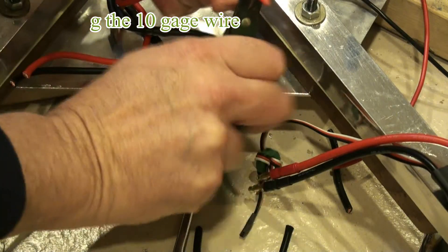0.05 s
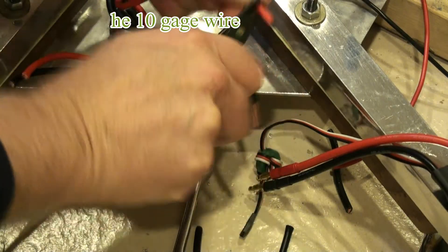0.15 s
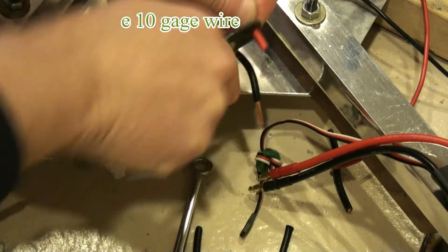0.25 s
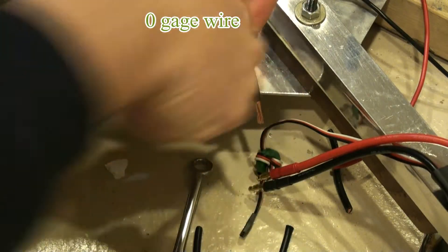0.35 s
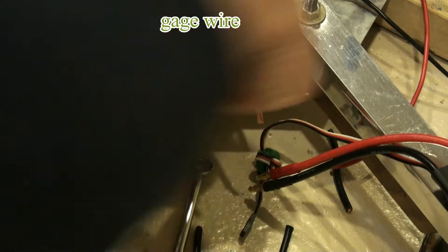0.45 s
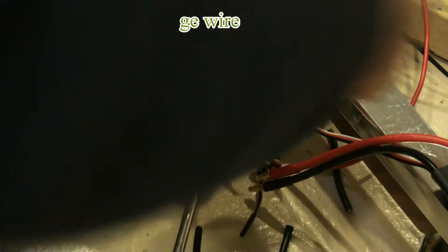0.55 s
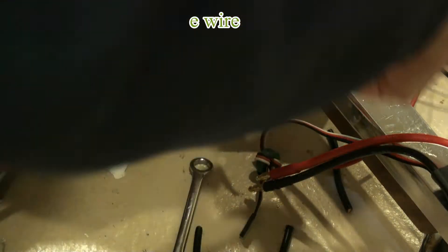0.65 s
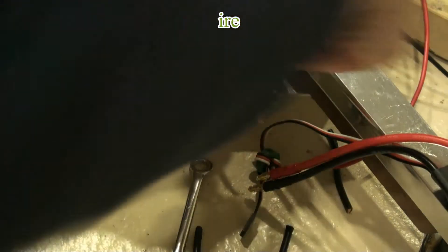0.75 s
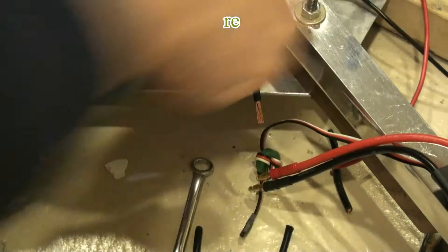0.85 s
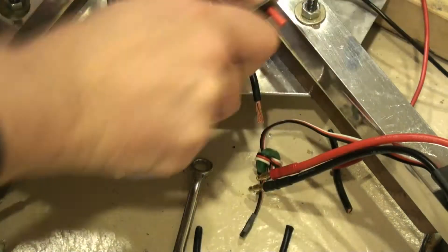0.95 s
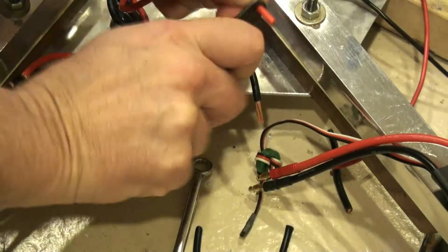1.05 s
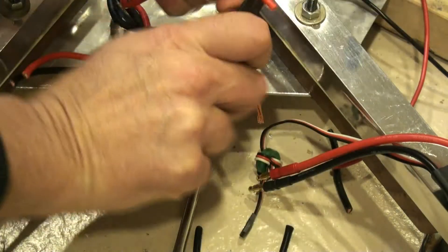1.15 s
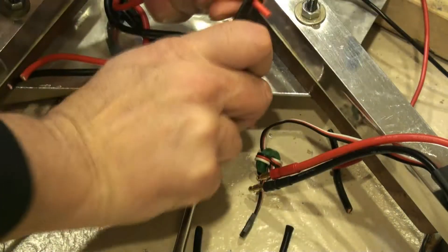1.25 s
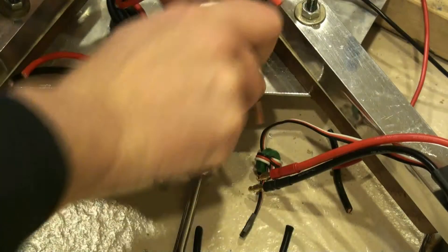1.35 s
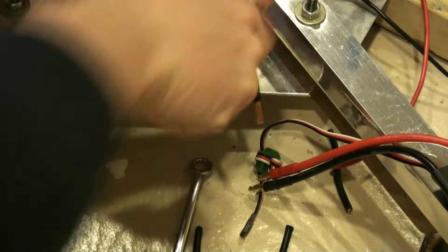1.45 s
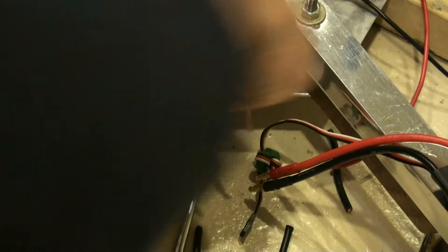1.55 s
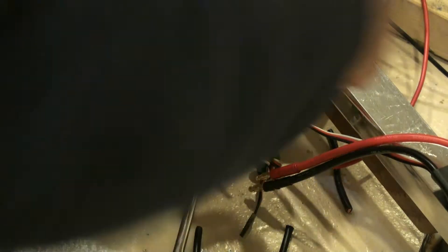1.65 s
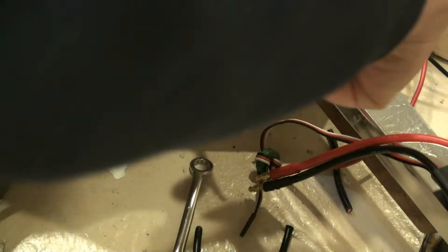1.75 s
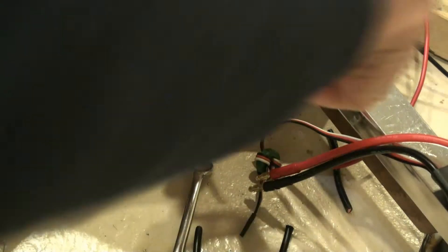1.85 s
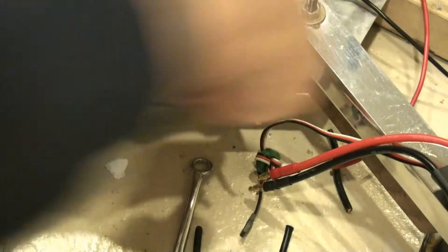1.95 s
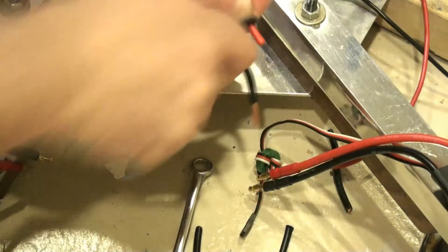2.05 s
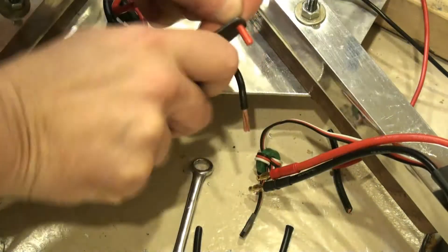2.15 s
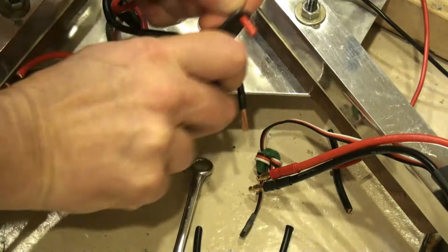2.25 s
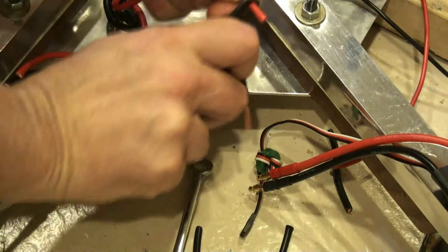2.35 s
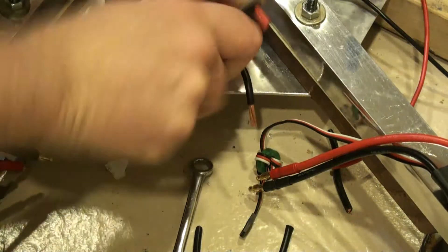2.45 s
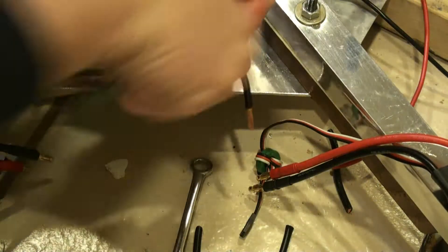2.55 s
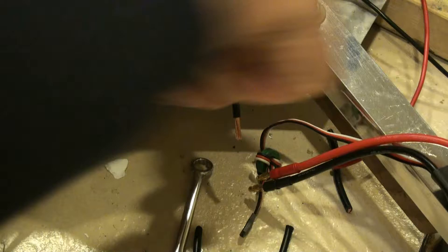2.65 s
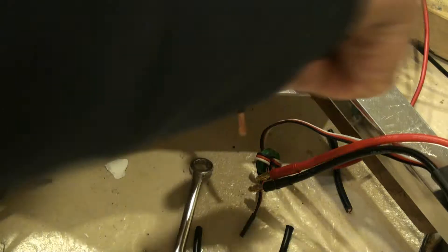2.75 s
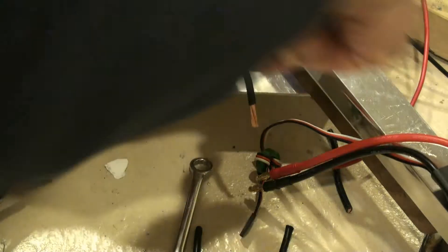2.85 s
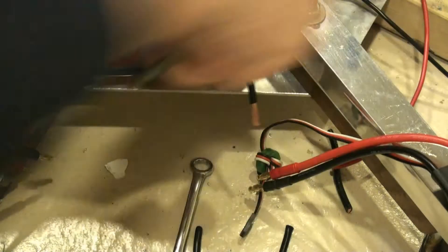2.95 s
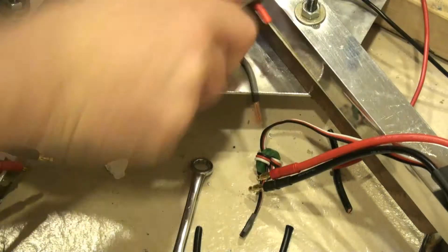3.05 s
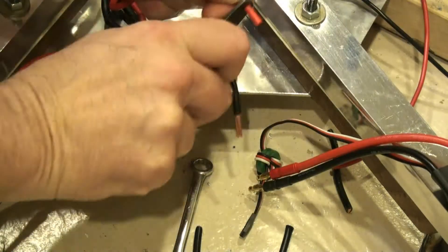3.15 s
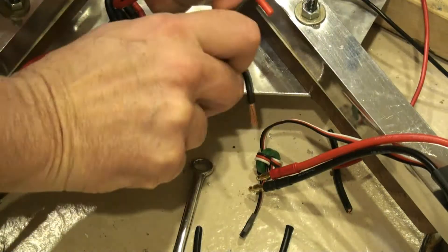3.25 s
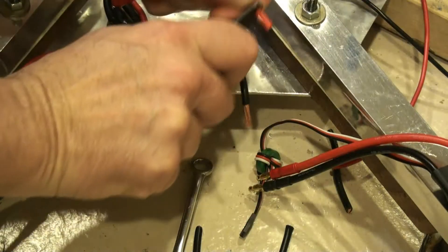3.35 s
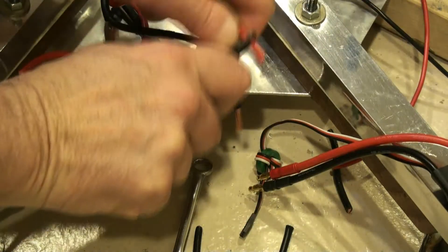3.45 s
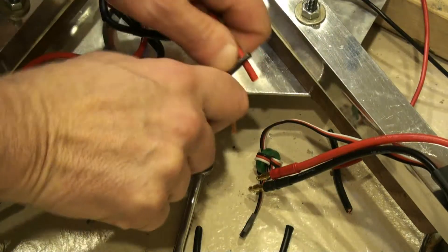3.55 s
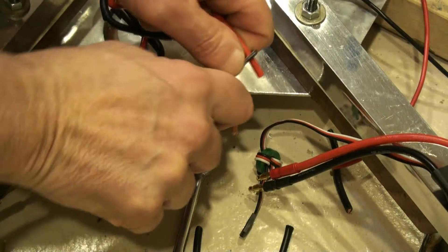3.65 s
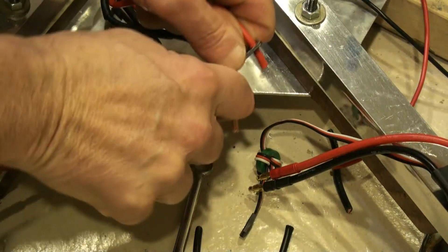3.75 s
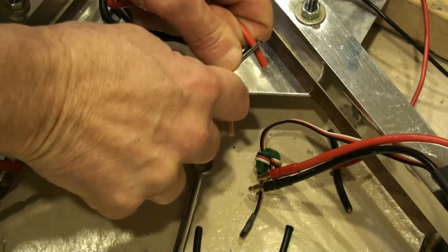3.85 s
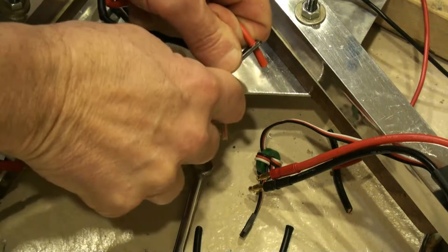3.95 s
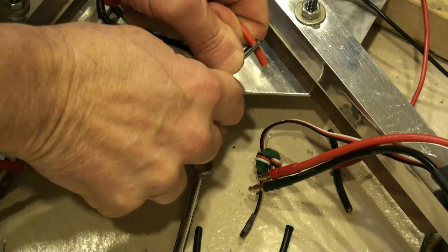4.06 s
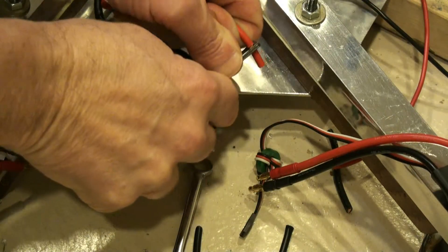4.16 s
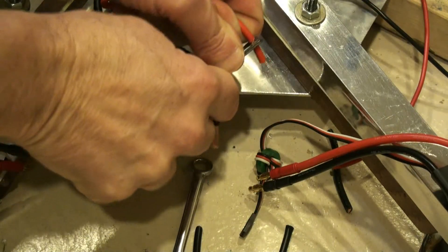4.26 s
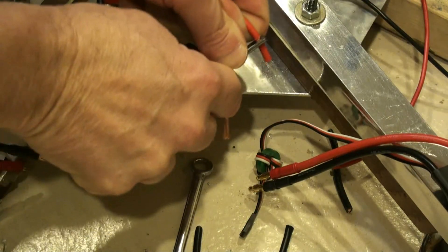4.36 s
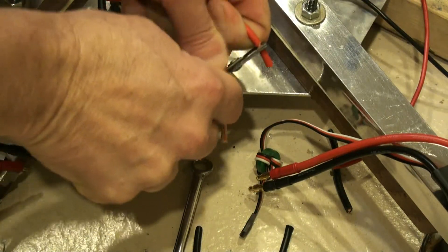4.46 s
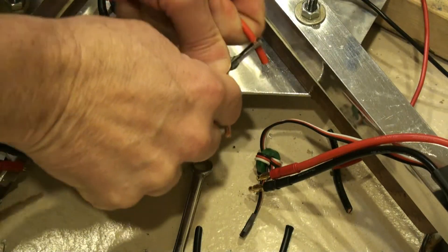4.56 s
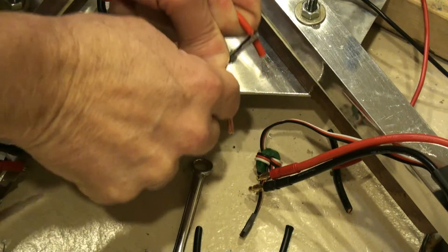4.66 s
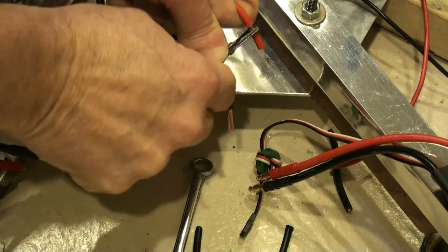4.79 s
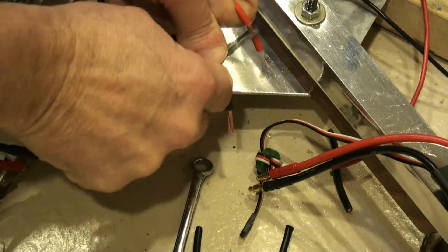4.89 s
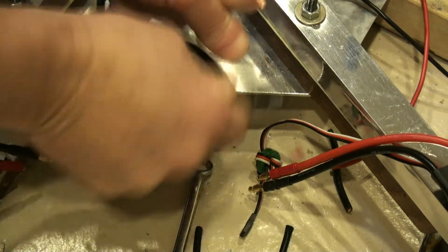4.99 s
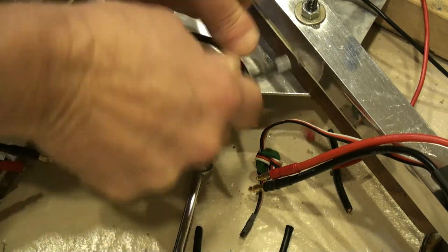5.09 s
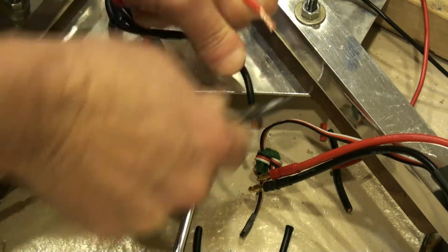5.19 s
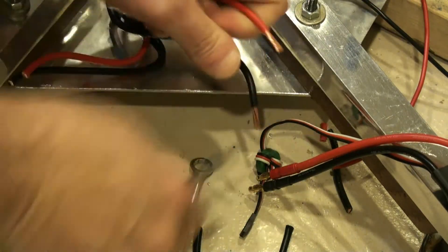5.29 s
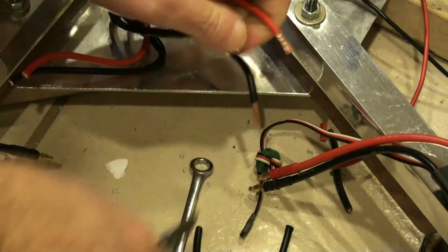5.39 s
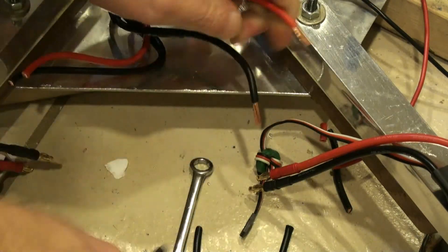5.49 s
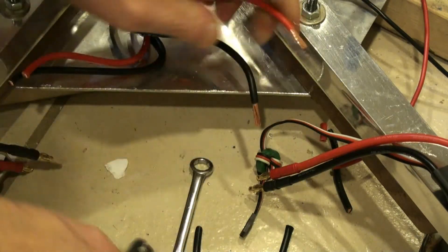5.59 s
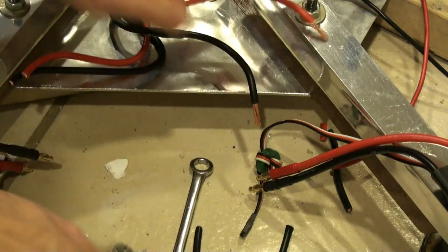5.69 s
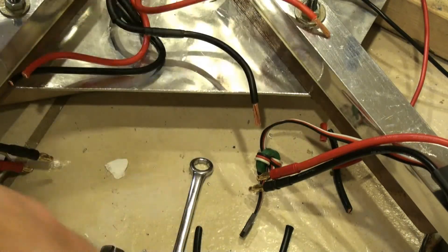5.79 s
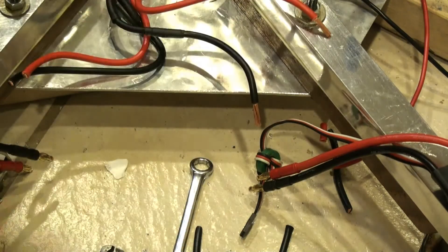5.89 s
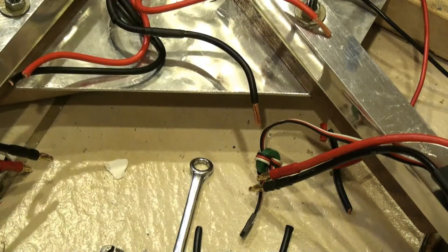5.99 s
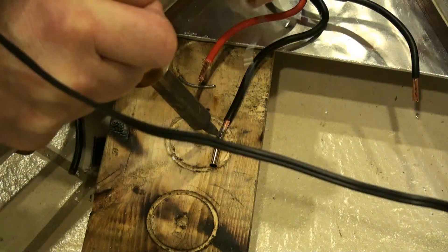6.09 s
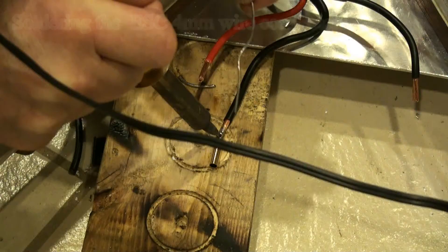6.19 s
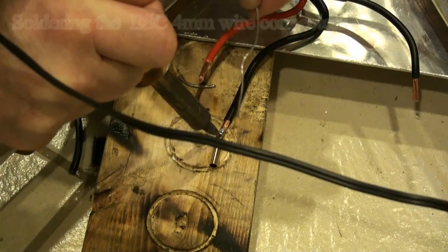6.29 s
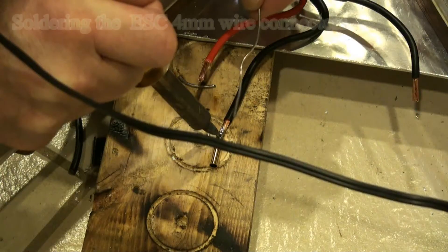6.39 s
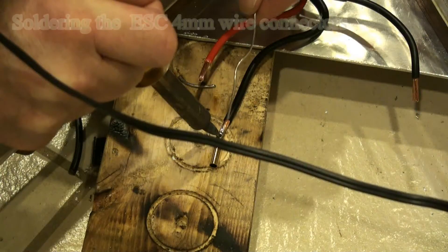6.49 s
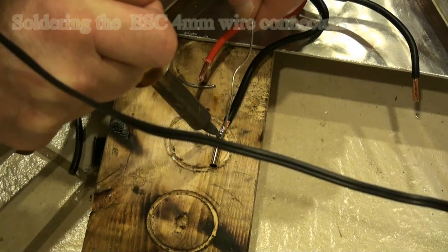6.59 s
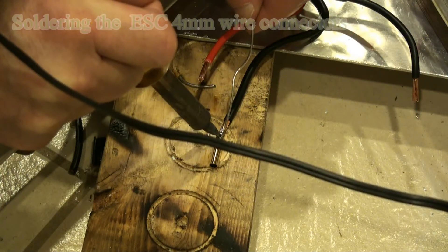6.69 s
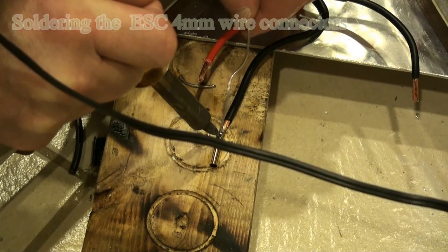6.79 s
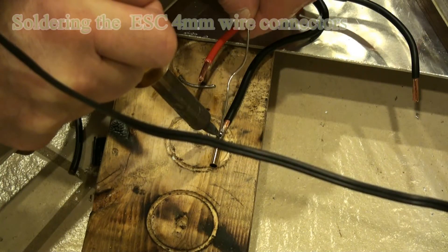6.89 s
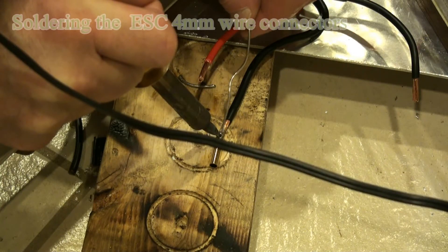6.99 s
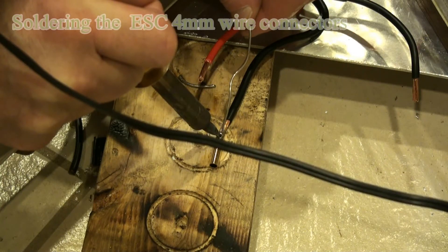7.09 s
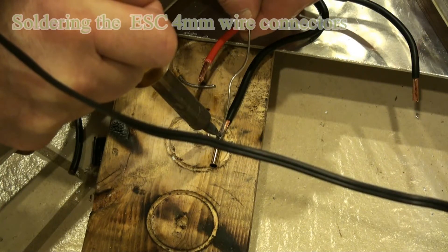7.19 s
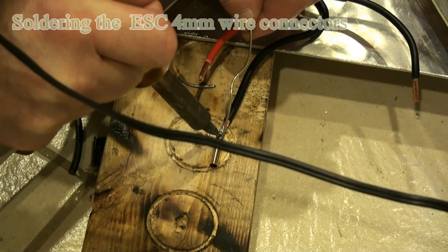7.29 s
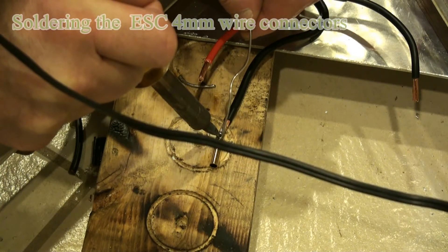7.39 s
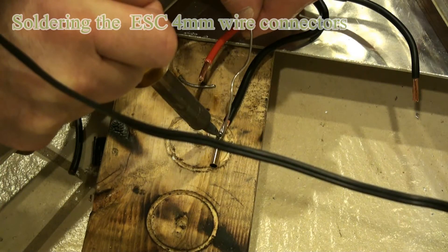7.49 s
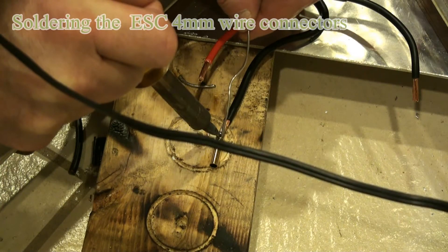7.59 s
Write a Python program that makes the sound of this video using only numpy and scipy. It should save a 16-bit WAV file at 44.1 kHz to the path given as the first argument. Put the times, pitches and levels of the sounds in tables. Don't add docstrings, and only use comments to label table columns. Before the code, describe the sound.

Cloth swishes and small metal jaw ticks over low room hiss, a thick wire cracks, its offcut bounces, and a steel tool rattles on a bench.

```python
import sys
import numpy as np
from scipy import signal
from scipy.fft import rfft, irfft
from scipy.io import wavfile
from scipy.ndimage import uniform_filter1d

SR = 44100
rng = np.random.default_rng(int(sys.argv[2]) if len(sys.argv) > 2 else 0)


def level_to_linear(level):
    exponent = np.asarray(level, float) / 20
    return 10 ** exponent


def store_pcm(level_fs):
    pcm = np.round(np.clip(level_fs, -1, 1) * 32767).astype(np.int16)
    wavfile.write(sys.argv[1], SR, np.atleast_2d(pcm).T)


N = 336747


def colour(points, size, channels=1):
    hz, db = np.transpose(points)
    gain = level_to_linear(np.interp(np.log(np.fft.rfftfreq(size, 1 / SR) + 1), np.log(hz), db))
    white = rng.standard_normal((channels, size))
    return irfft(rfft(white) * gain / np.sqrt(np.mean(gain ** 2)), size)


def band(hz, octaves):
    return [(hz / 2 ** octaves, -40), (hz, 0), (hz * 2 ** octaves, -40)]


def flicker(rate, db):
    steps = rng.standard_normal(400)
    return level_to_linear(db * np.interp(np.arange(N) / SR * rate, np.arange(400), steps))


def add(out, s, sound, pan_db):
    i = int(s * SR)
    out[:, i:i + len(sound)] += sound * level_to_linear(np.array([[pan_db], [-pan_db]]) / 2)


# frequency in Hz, side minus mid in dB.
NOISE_WIDTH = [(30, -26.5), (120, -1), (300, -0.5), (1000, 3), (3000, 2.5), (8000, -10), (13000, -6)]


def stereo(points):
    hz, db = np.transpose(points)
    width_hz, width_db = np.transpose(NOISE_WIDTH)
    side_db = db + np.interp(np.log(hz), np.log(width_hz), width_db)
    mid_power = np.sum(hz * level_to_linear(2 * db))
    side_power = np.sum(hz * level_to_linear(2 * side_db))
    mid = colour(points, N)
    side = np.sqrt(side_power / mid_power) * colour(np.transpose([hz, side_db]), N)
    return mid + side * np.array([[1], [-1]])


# frequency in Hz, density in dB per Hz.
ROOM_HISS = [(15, -35), (25, -15.5), (85, -8), (102, -10), (123, -15.5), (147, -11.5), (242, -10),
             (269, -6.5), (368, -8.5), (477, -8), (826, -6.5), (917, -7.5), (1190, -7.5), (3130, -13.5),
             (12800, -20), (16600, -61.5), (22000, -120)]
# frequency in Hz, rms level in dB.
LAMP_HUM = [(119.9, -72.5), (360, -78.5), (840, -69), (1130, -78.5), (1680, -105), (2520, -82)]


def air():
    t = np.arange(N) / SR
    hum = np.zeros(N)
    for hz, db in LAMP_HUM:
        hum += np.sqrt(2) * level_to_linear(db) * flicker(3.51, 1.1) * np.sin(2 * np.pi * hz * t)
    return level_to_linear(-60.5) * flicker(3, 0.3) * stereo(ROOM_HISS) + hum


def swells(moves):
    ends_db = -12
    t = np.arange(0, N, 64) / SR
    power = np.zeros(len(t))
    for s, half_s, db in moves:
        level_db = db + ends_db * ((t - s) / half_s) ** 2
        power += level_to_linear(np.maximum(level_db, -120)) ** 2
    return np.interp(np.arange(N) / SR, t, np.sqrt(power))


# frequency in Hz, density in dB per Hz.
CLOTH_HISS = [(1500, -10), (3000, -4), (5000, -1.5), (8000, -3), (12500, -4.5), (14500, -18), (16000, -37)]
# middle in seconds, half length in
# seconds, level in dB.
SLEEVE_SWISHES = [(0.12, .05, -67), (0.36, 0.22, -63), (0.595, 0.07, -59), (0.79, 0.18, -65.5),
                  (1.06, 0.19, -73), (1.375, 0.013, -58.5), (1.42, 0.13, -70.5), (1.68, 0.13, -62.5),
                  (1.92, 0.15, -65), (2.18, 0.098, -68.5), (2.41, .04, -77), (2.73, 0.2, -66.5),
                  (2.87, 0.13, -67.5), (3.03, 0.077, -60.5), (3.37, 0.23, -72), (3.62, .06, -69),
                  (3.81, .05, -74), (4.34, .03, -70), (4.41, 0.07, -66.5), (4.69, 0.012, -66),
                  (5.25, 0.24, -68), (5.56, 0.12, -67)]
# middle in seconds, half length in seconds, level in dB.
HAND_SHIFTS = [(0.12, 0.091, -66.5), (0.42, 0.3, -67.5), (0.67, 0.026, -77), (0.87, 0.063, -63.5),
               (1.09, .07, -65.5), (1.21, 0.066, -63), (1.46, 0.03, -65.5), (1.65, 0.14, -69),
               (1.92, 0.07, -70), (2.17, 0.044, -71), (2.41, 0.049, -73), (2.66, .08, -76),
               (2.81, .025, -74), (2.95, 0.06, -63), (3.07, 0.12, -61), (3.48, 0.077, -68),
               (3.86, .2, -70.5), (4.16, .07, -75), (4.33, 0.047, -70.5), (4.41, .06, -59.5),
               (4.59, 0.069, -69), (4.86, .025, -72), (5.15, 0.17, -67), (5.33, 0.037, -69),
               (5.51, .05, -66), (5.62, 0.035, -55)]


def rustle():
    hiss = level_to_linear(2.5) * swells(SLEEVE_SWISHES) * flicker(40, 1.0) * stereo(CLOTH_HISS)
    rumble = swells(HAND_SHIFTS) * flicker(25, 2.5) * stereo(band(390, 2.4))
    return hiss + rumble


# centre in Hz, T60 in seconds, level in dB, side minus mid in dB.
ROOM_BANDS = [(147.6, .6, 5.5, -36), (400, 0.54, 14, -17.5), (1054, .42, -2, -2), (1550, 0.34, 7, -7),
              (2430, 0.3, 7.5, -9.5), (5500, 0.33, 2, -8), (8890, 0.2, 7.5, -5), (13420, 0.17, 8, -17)]


def room(x):
    late_db, late_stretch = -24.5, 3.4
    t = np.arange(2 ** 15) / SR
    mid_side = np.zeros((2, len(t)))
    for hz, t60, db, side_db in ROOM_BANDS:
        fade = 1000 ** (-t / t60) + level_to_linear(late_db) * 1000 ** (-t / t60 / late_stretch)
        level = level_to_linear(np.array([[db], [db + side_db]])) * np.sqrt(hz)
        mid_side += level * colour(band(hz, 2.2), len(t), channels=2) * fade
    mid, side = mid_side
    reply = np.array([mid + side, mid - side]) * np.minimum(t / 0.001, 1)
    reply /= np.sqrt(np.sum(mid ** 2))
    return signal.oaconvolve(x, reply, axes=1)[:, :N]


# start in seconds, level in dB, pitch in Hz, T60 in seconds.
BENCH_KNOCKS = [(4.906, -35, 210, 0.058), (4.914, -48, 96.9, 0.85), (4.988, -49.5, 100, 0.27),
                (5.497, -30, 400, 0.01), (5.497, -41, 222.6, 0.2), (5.513, -50.5, 221, 0.15),
                (5.651, -34, 224.7, 0.44), (5.652, -28, 395, 0.038), (5.70, -41.5, 160.7, 0.18),
                (5.75, -22.5, 216, 0.04), (5.66, -45, 79.5, 0.36), (5.76, -46.5, 108, 0.31)]


def knocks():
    near, t = np.zeros((2, N)), np.arange(SR // 2) / SR
    for s, db, hz, t60 in BENCH_KNOCKS:
        mode = np.sin(2 * np.pi * hz * t) * 1000 ** (-t / t60)
        add(near, s, level_to_linear(db) * mode * np.minimum(t * hz, 1), 0)
    return near, level_to_linear(-5) * near


# from Hz, to Hz.
BLOW_PARTS = [(1200, 3000), (600, 1200), (3000, 5500), (5500, 15000)]


def hits(events, modes, rise_s, contact_s, ring_db, pan_db, wet_db, dull_hz=20000):
    near, spread, t = np.zeros((2, N)), np.zeros((2, N)), np.arange(4096) / SR
    mode_hz, mode_db, t60 = np.transpose(modes)[:, :, None]
    fine_hz = np.fft.rfftfreq(4096, 1 / SR)
    filters = [signal.butter(3, part, "bandpass", fs=SR) for part in BLOW_PARTS]
    shapes = np.array([signal.freqz(*f, fine_hz, fs=SR)[1] for f in filters])
    shapes *= np.array([[1], [-1], [-1], [1]])
    shapes /= (1 + 1j * fine_hz / dull_hz) ** 2
    plain = irfft(shapes)
    for s, body_db, *parts_db, own_hz in events:
        contact = rng.standard_normal(4096) * np.exp(-t / contact_s) * np.minimum(t / rise_s, 1)
        luck_db = 3 * rng.standard_normal((len(modes), 1))
        partials = np.sin(2 * np.pi * mode_hz * t) * 1000 ** (-t / t60)
        ring = np.sum(level_to_linear(ring_db + mode_db + luck_db) * partials, axis=0)
        ring += level_to_linear(ring_db + 14) * np.sin(2 * np.pi * own_hz * t) * 1000 ** (-t / 0.012)
        ring[0] = 1
        parts = irfft(rfft(contact) * rfft(ring) * shapes)
        gains = level_to_linear(body_db + np.array([0, *parts_db])) / np.abs(parts).max(axis=1)
        add(near, s, gains @ parts, pan_db)
        add(spread, s, (gains * parts.std(axis=1) / plain.std(axis=1)) @ plain, 0)
    wall_filter = signal.butter(2, [800, 2700], "bandpass", fs=SR)
    wall = signal.lfilter(*wall_filter, np.roll(near, int(0.0135 * SR), axis=1))
    return near + level_to_linear(-9) * wall, level_to_linear(wet_db) * spread


# start in seconds, body peak in dB, edge against body in dB, loudest ring in Hz.
DULL_TICKS = [(0.8295, -51, -13, 1460), (1.1987, -41.5, -25, 990), (1.2868, -42.5, -4, 1750),
              (1.8639, -39, 0.5, 1800), (2.1527, -39.5, -7, 2500), (2.2573, -48, -5, 1120),
              (2.807, -39.5, 1.5, 1600), (3.071, -46, -16, 1930), (3.1098, -50.5, -6, 923),
              (3.1433, -49, -14, 1140), (3.2128, -34.5, -0.5, 1790), (3.5962, -38, -4, 1830),
              (4.1424, -47.5, -8, 2860), (4.4106, -43, -20, 2360), (4.4154, -41, -13, 1430),
              (4.5381, -48.5, 4, 2900), (4.6864, -47.5, 3, 2200), (5.5268, -47, -14.5, 1410),
              (6.7854, -57, 15.5, 4060), (6.9591, -43, -0.5, 3950)]
# start in seconds, body peak in dB, edge against body in dB, loudest ring in Hz.
STEEL_CLICKS = [(0.111, -43.5, -14, 1430), (1.3646, -41, -4, 1030), (1.4197, -48.5, -22, 915),
                (2.2034, -57, 2, 2530), (2.3997, -42.5, -10, 1890), (3.0264, -49, 4, 1350),
                (3.3244, -72, -5, 1140), (3.4105, -46, 6, 3390), (4.3725, -55, -5, 2350),
                (4.3784, -45, 0, 1460), (4.6134, -55, -10, 1090), (5.624, -43, 1, 2630)]
# frequency in Hz, level in dB, T60 in seconds.
JAW_MODES = [(758, -1, 0.033), (1120, -5, 0.025), (1790, -2, .04), (2680, -1, 0.034), (3540, 0, 0.019),
             (4500, -6.5, 0.02)]


def jaws():
    blows = []
    for rows, bright_db in ((DULL_TICKS, -48), (STEEL_CLICKS, 0)):
        for s, db, edge_db, hz in rows:
            bench_db = max(-7 - 6.5 * np.log2(hz / 1500), -18)
            blows.append((s, db, bench_db, edge_db, bright_db, hz))
    return hits(blows, JAW_MODES, rise_s=0.00024, contact_s=0.0014, ring_db=-39, pan_db=0.8, wet_db=-7.0)


def on_bench(rows, bench_db):
    return [(s, db, bench_db, *rest) for s, db, *rest in rows]


# start in seconds, body peak in dB, edge and bright parts against it in dB,
# loudest ring in Hz.
TOOL_RATTLE = [(5.6515, -20, -1.5, 9, 11680), (5.6795, -29, 7.5, 23, 7870),
               (5.7018, -21.5, -10, 14.5, 7200), (5.7240, -30.5, -8, 24.5, 12400),
               (5.7475, -21.5, 3.5, 7, 7080), (5.7665, -20, -1, 1.5, 2014), (5.7725, -24, -15.5, 17, 11280),
               (5.7915, -27, 1, 15, 8000), (5.8135, -25.5, 1.5, 2.5, 2060)]
# frequency in Hz, level in dB, T60 in seconds.
TOOL_MODES = [(1400, -2, .03), (2000, -2, .025), (4100, -3, .02), (5420, 0, .03), (6820, 1, .03),
              (8100, 2, .045), (10400, 1, .025), (11500, 1, .03), (12400, 1, .03), (13100, 2, .04)]


def dropped_tool():
    return hits(on_bench(TOOL_RATTLE, -3), TOOL_MODES, rise_s=0.0003, contact_s=0.0019,
                ring_db=-29.5, pan_db=0.3, wet_db=-0.44)


# start in seconds, body peak in dB, edge and bright parts against it in dB,
# loudest ring in Hz.
WIRE_BLOWS = [
    (4.9035, -21.5, 0.5, 4, 4865),
    (4.9425, -37, -9, 12.5, 7300),
    (4.9643, -40, 11.5, 10.5, 5200),
    (5.0035, -40.5, -7.5, 9.5, 6200),
    (5.0127, -48.5, -10, 14.5, 5850),
    (5.0853, -49.5, -10, 19.5, 9000),
]
# frequency in Hz, level in dB, T60 in seconds.
WIRE_MODES = [(780, -2, 0.022), (940, 5, 0.013), (1930, 1.5, 0.058), (2440, -15, .02), (3050, 18, 0.004),
              (4800, -13, 0.035), (5180, 2.5, 0.038), (7860, 19, 0.006)]


def wire_snap():
    return hits(on_bench(WIRE_BLOWS[:1], -2), WIRE_MODES, rise_s=0.0019, contact_s=0.0013,
                ring_db=-35, pan_db=2.1, wet_db=-7.5, dull_hz=7020)


def offcut_bounces():
    return hits(on_bench(WIRE_BLOWS[1:], -12.5), WIRE_MODES, rise_s=0.00069, contact_s=0.00056,
                ring_db=-45, pan_db=0.3, wet_db=-5.5, dull_hz=12000)


def scene():
    sources = [knocks(), jaws(), dropped_tool(), wire_snap(), offcut_bounces()]
    near, spread = np.sum(sources, axis=0)
    room_sounds = np.arange(N) < 6.043 * SR
    return air() + rustle() + room(spread) * room_sounds + near


def low_pass(x):
    return signal.sosfilt(signal.butter(12, 16060, fs=SR, output="sos"), x)


# from Hz, to Hz, least level in dB.
TREBLE_GATES = [(12950, 13700, -74.5), (13700, 14500, -64), (14500, 15250, -57), (15250, 16050, -38)]


def record(dry):
    spectrum, hz = rfft(dry, 2 ** 19), np.fft.rfftfreq(2 ** 19, 1 / SR)
    mix = irfft(spectrum * (hz < TREBLE_GATES[0][0]))[:, :N]
    for low_hz, high_hz, least_db in TREBLE_GATES:
        part = irfft(spectrum * (hz >= low_hz) * (hz < high_hz))[:, :N]
        power = uniform_filter1d(np.mean(part ** 2, axis=0), size=1024)
        is_loud = power > level_to_linear(2 * least_db)
        mix += part * uniform_filter1d(1.0 * is_loud, size=256)
    return low_pass(mix)


dry = scene()
out = record(dry)
store_pcm(out)
```